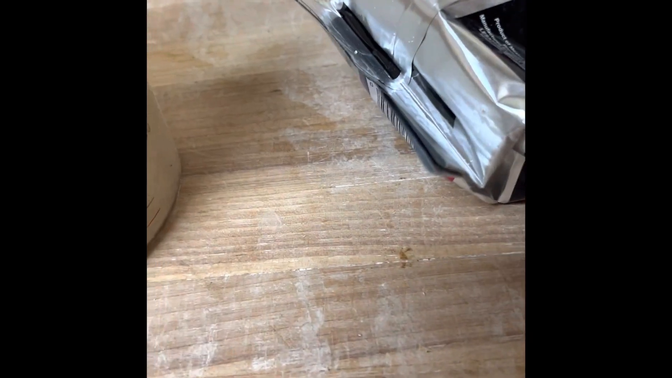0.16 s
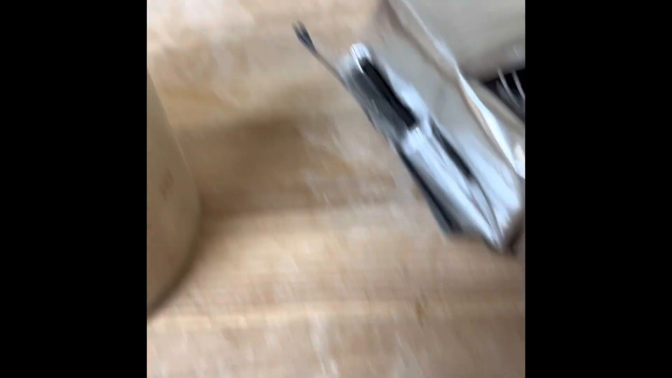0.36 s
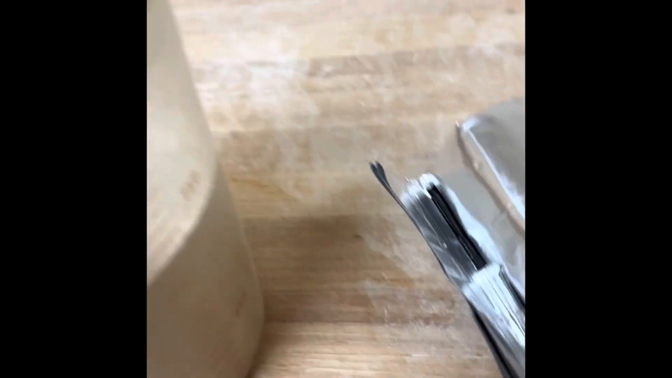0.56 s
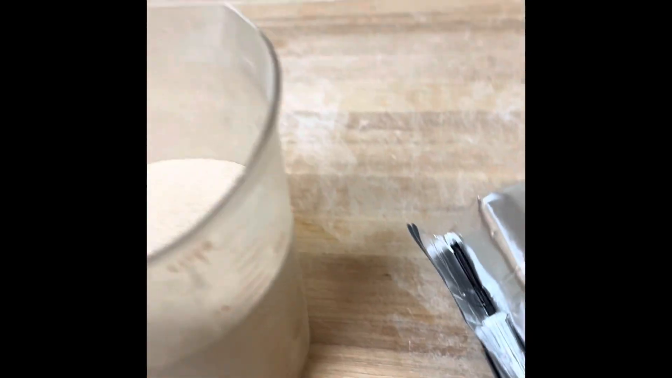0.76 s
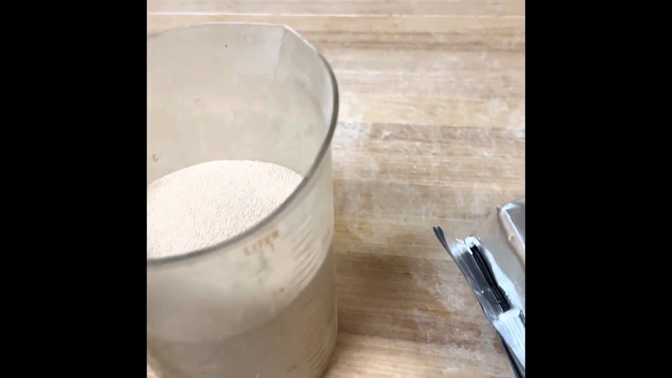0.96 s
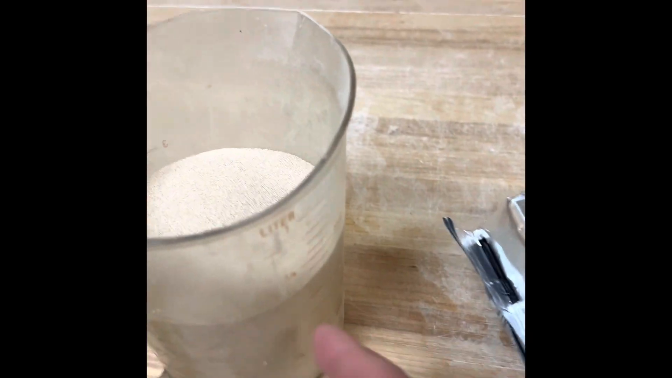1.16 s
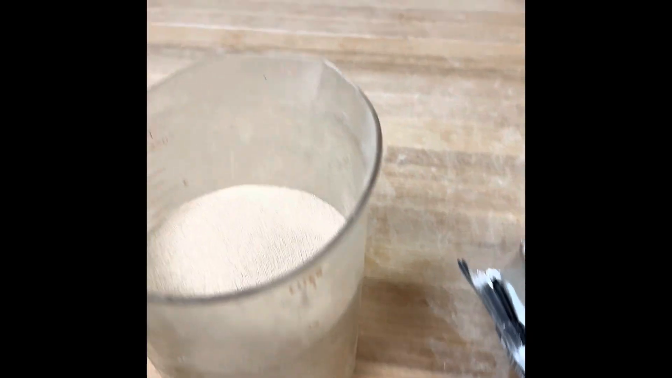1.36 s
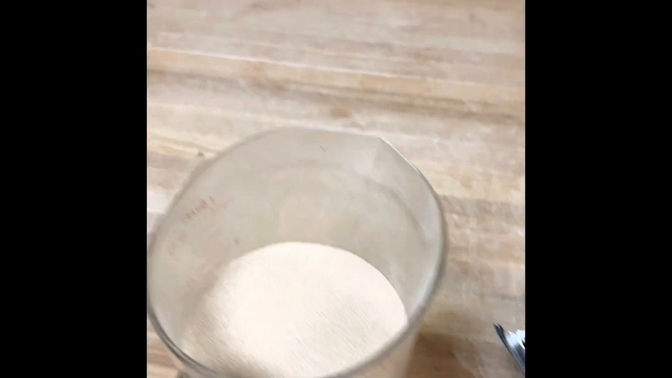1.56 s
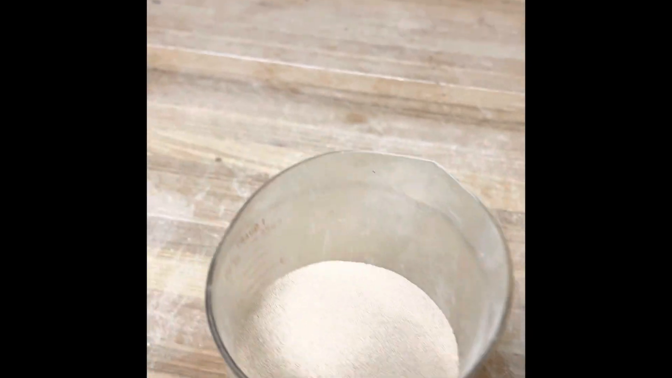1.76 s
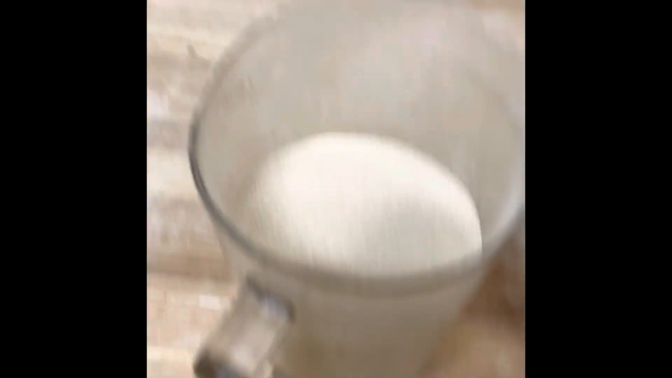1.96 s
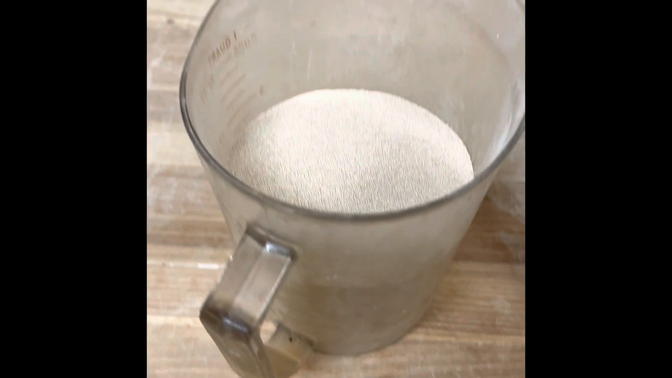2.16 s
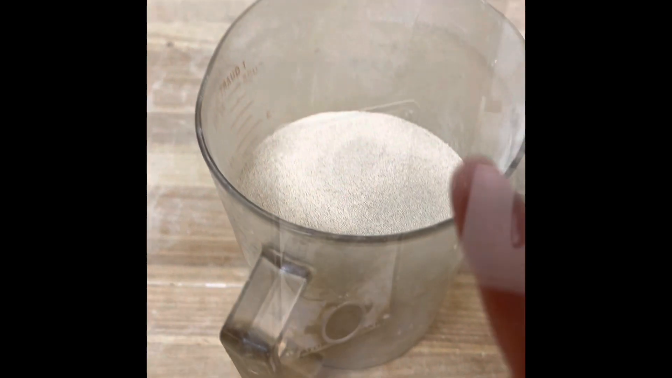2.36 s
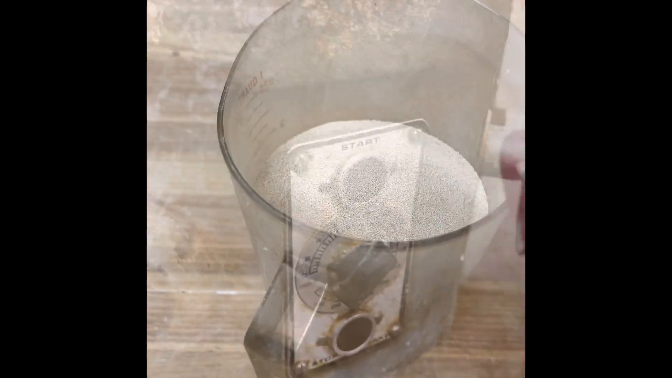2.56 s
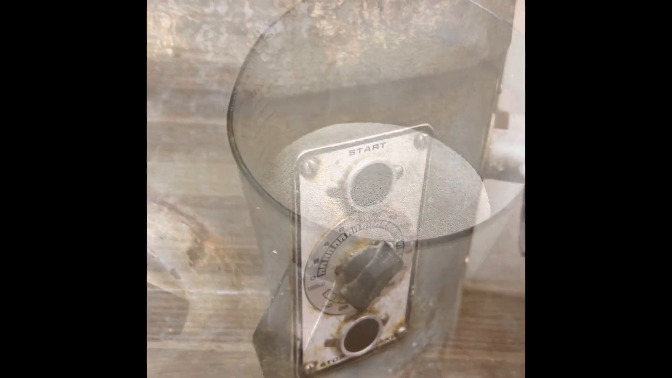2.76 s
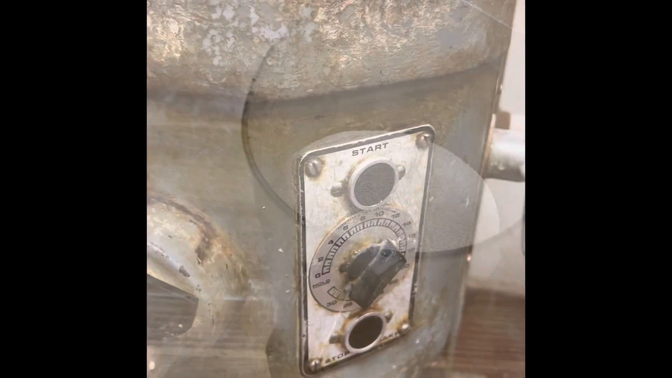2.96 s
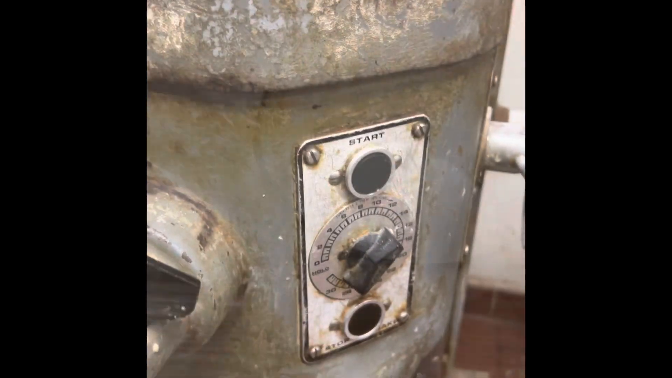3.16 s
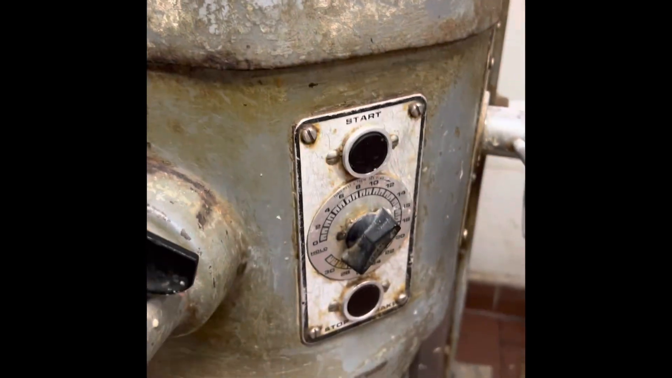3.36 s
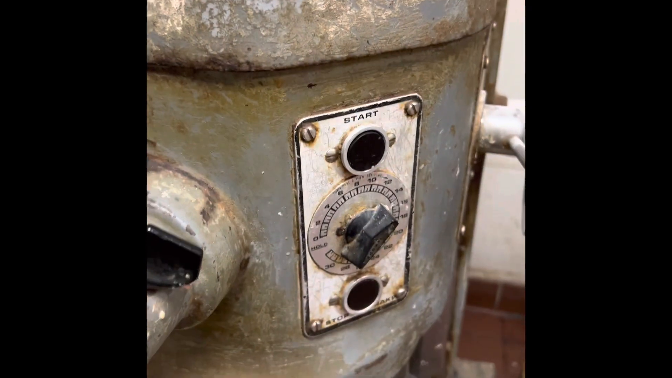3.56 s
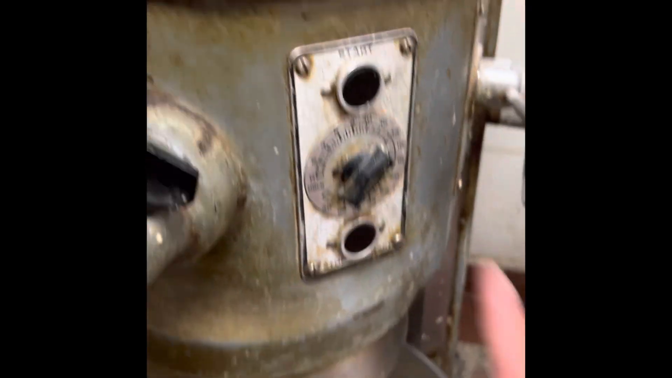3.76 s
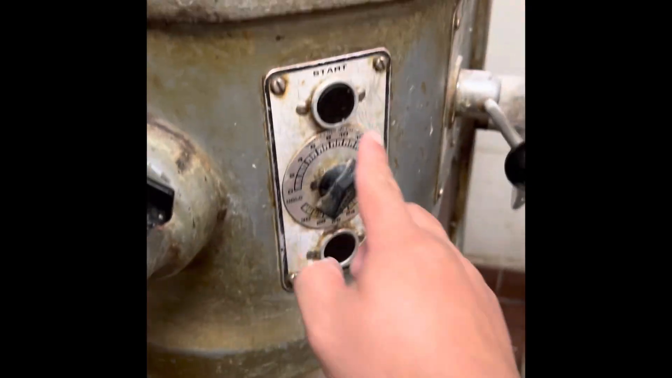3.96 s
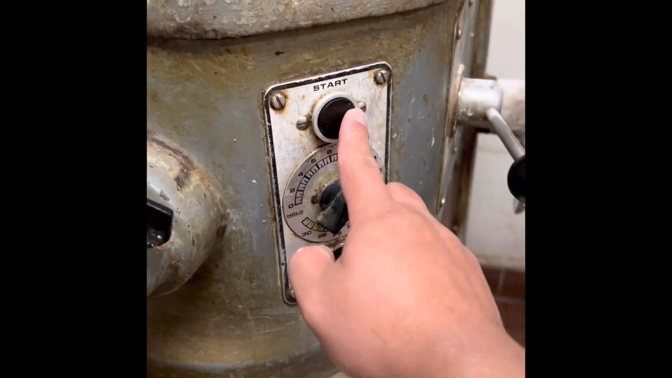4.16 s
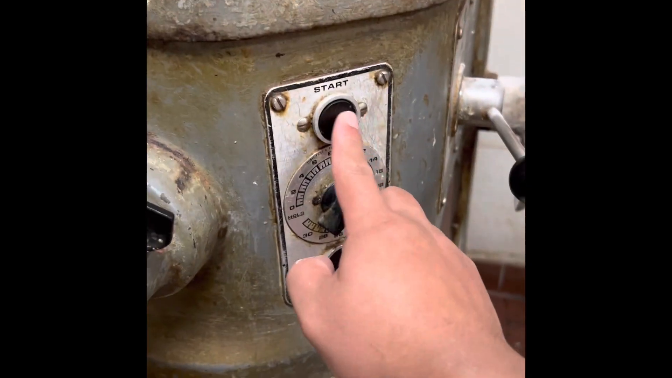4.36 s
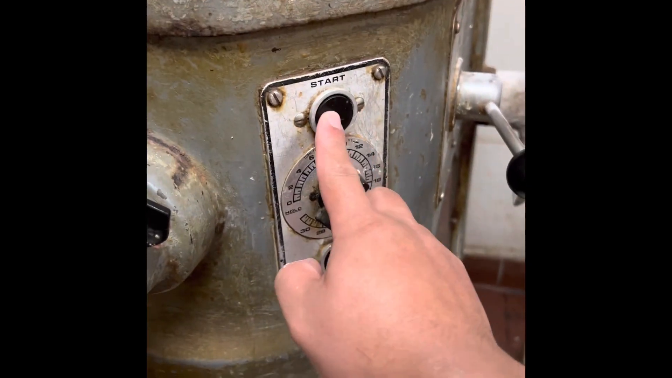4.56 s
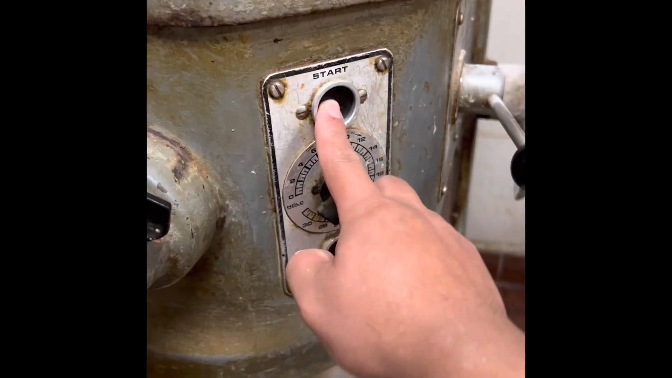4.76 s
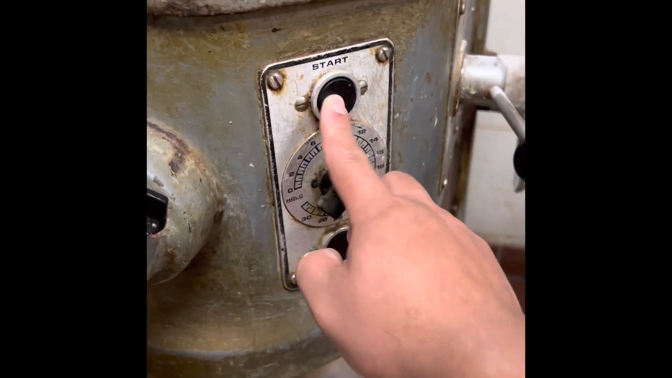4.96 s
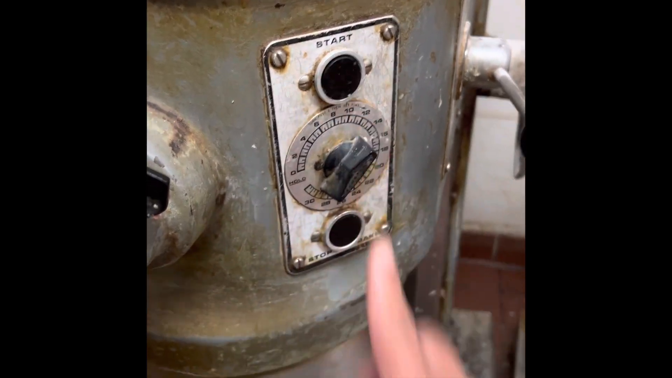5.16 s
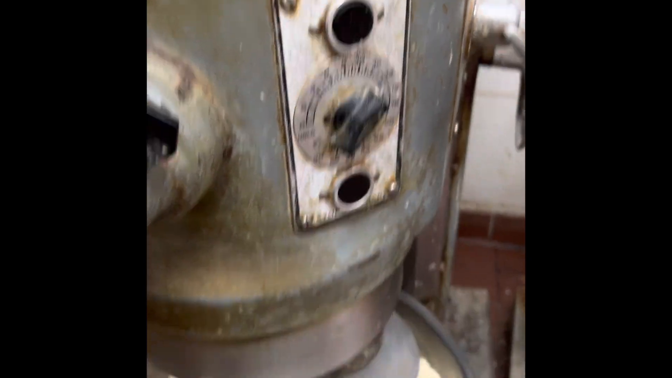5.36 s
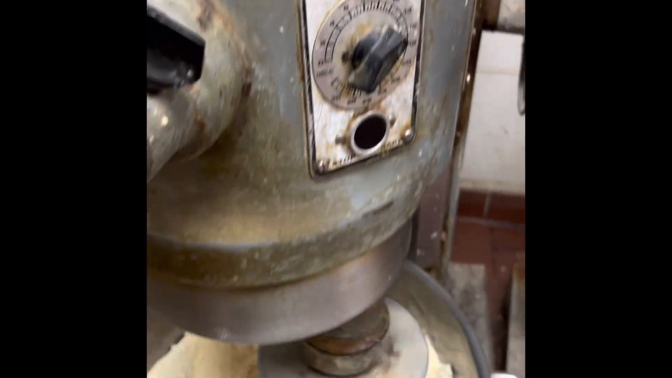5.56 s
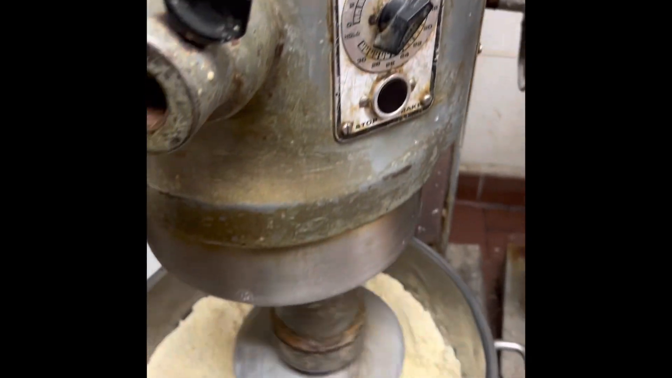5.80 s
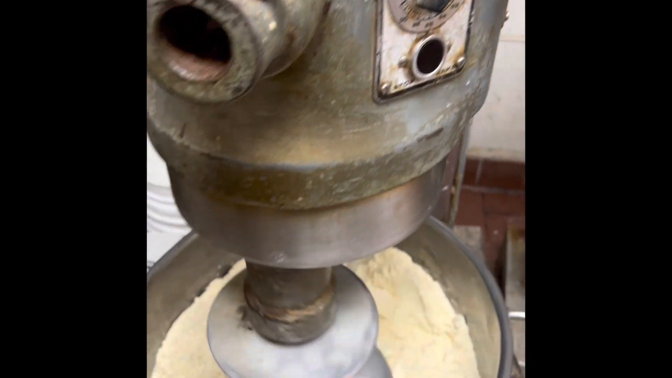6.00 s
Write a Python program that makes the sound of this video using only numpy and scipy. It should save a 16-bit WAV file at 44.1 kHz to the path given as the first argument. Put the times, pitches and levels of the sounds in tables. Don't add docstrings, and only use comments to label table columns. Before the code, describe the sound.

A bakery kitchen hums quietly with fridges and fans, low and steady under faint airy whistles. Around 0.7 s a thin whine near 840 Hz steps up and slowly grows; at 0.8 s the wooden bench gets a soft dull knock. Very faint, high bearing chirps come at 1.4-1.7 s and again at 3.0-3.4 s. Glass ticks lightly at 2.4-2.7 s while the ambience fades, by 3.3 s, into the hum beside a large mixer. A tiny tick falls at 4.1 s. At 4.65 s the button clicks, and at 4.74 s a contactor slams with a huge, echoing steel clunk. The casing groans and climbs in pitch, strongest at 4.8 s; gears whirr faster, and a lighter switch clack lands near 4.98 s. Slack gear teeth knock at 5.2 and 5.7-5.8 s over a rumble swelling about twice a second until the end.

```python
import sys
import numpy as np
from scipy import signal
from scipy.fft import rfft, irfft
from scipy.io import wavfile
from scipy.ndimage import uniform_filter1d

SR = 44100
rng = np.random.default_rng(int(sys.argv[2]) if len(sys.argv) > 2 else 0)


def amplitude_ratio(level_db):
    exponent = np.asarray(level_db, float) / 20
    return 10 ** exponent


def wrap_up_sound(samples):
    columns = np.atleast_2d(samples).T
    tamed = np.clip(columns, -1, 1)
    steps = np.round(tamed * 32767).astype(np.int16)
    wavfile.write(sys.argv[1], SR, steps)


N = 265905
T = np.arange(N) / SR
START_S, DROP_OUT_S = 4.745, 4.96


def evened(x):
    return x / np.sqrt(np.mean(x ** 2) + 1e-20)


def read(points, hz):
    f, value = np.transpose(points)
    return np.interp(np.log(hz + 1), np.log(f + 1), value)


def coloured(x, points):
    hz = np.fft.rfftfreq(x.shape[-1], 1 / SR)
    return irfft(rfft(x) * amplitude_ratio(read(points, hz)), x.shape[-1])


def drift(per_s):
    t = T[::64]
    rates = np.geomspace(0.089 * per_s, per_s, num=12)
    slow = sum(np.sin(2 * np.pi * (f * t + rng.random())) / np.sqrt(f) for f in rates)
    return np.interp(T, t, evened(slow))


def resonate(x, hz, width):
    r = np.exp(-1.5 * np.pi * width / SR)
    pole = [1, -r * np.exp(2j * np.pi * hz / SR)]
    once = signal.lfilter([1 - r], pole, x)
    return 2 * signal.lfilter([1 - r], pole, once).real


def ringing(modes):
    hz = np.fft.rfftfreq(N, 1 / SR)
    power = sum(amplitude_ratio(2 * db) / width / (1 + ((hz - f) / width * 1.3) ** 2) ** 2 for f, width, db in modes)
    low_cut = hz ** 4 / (hz ** 4 + 70 ** 4)
    return evened(irfft(rfft(rng.standard_normal((2, N))) * np.sqrt(power) * low_cut, N))


# (frequency [Hz], left over right [dB])
BALANCE_DB = [(60, 0.5), (150, 0.7), (380, 2.5), (950, -1), (2380, 0.5), (5980, 0.5), (15000, 0.17)]
# (frequency [Hz], left leads by [rad])
LEAD = [(60, 0.53), (170, 0.12), (300, 0.37), (650, -1.85), (1600, -0.33), (3000, -0.6), (15000, -1.7)]


def ports(near, other, likeness):
    hz = np.fft.rfftfreq(N, 1 / SR)
    same = np.clip(read(likeness, hz), 0, 1)
    left = rfft(near)
    right = same * left + np.sqrt(1 - same ** 2) * rfft(other)
    right = right * np.exp(-1j * read(LEAD, hz))
    tilt = amplitude_ratio(read(BALANCE_DB, hz) / 2)
    return irfft(np.array([left * tilt, right / tilt]), N)


def dissolve():
    from_s, to_s = 2.3, 3.33
    return np.clip((T - from_s) / (to_s - from_s), 0, 1)


# (frequency [Hz], width [Hz], level at the bench [dB], level at the mixer [dB])
GRILLES = [(1573, 31, -78.5, -73.5), (2780, 560, -79, -71.5), (3350, 89, -79, -77.5),
           (4330, 520, -77.5, -73.5), (5300, 80, -90, -84.5), (6290, 34, -76.5, -79),
           (6910, 740, -75.5, -86), (12200, 1400, -88, -87)]


def place(air, air_db, tones, column):
    out = amplitude_ratio(air_db - 0.5 + 0.5 * drift(7.4)) * evened(coloured(rng.standard_normal((2, N)), air))
    for row in GRILLES:
        out += amplitude_ratio(row[column] + 1.5 * drift(8.5)) * ringing([(*row[:2], 0)])
    for hz, db in tones:
        turns = np.cumsum(hz * (1 + 0.0008 * drift(4))) / SR + rng.random() + [[0], [0.25]]
        out += np.sqrt(2) * amplitude_ratio(db + 0.55 * drift(6)) * np.sin(2 * np.pi * turns)
    return out


# (frequency [Hz], density [dB per Hz])
BENCH_AIR = [(15, -66), (25, -51), (44, -17.5), (107, -9.5), (150, -13.5), (215, -11.5), (297, -15.5),
             (410, -18), (782, -30), (1050, -35.5), (3000, -44.5), (6550, -55), (9000, -63), (15500, -85)]
MIXER_AIR = [(15, -36), (25, -12.5), (75, -8.5), (113, 2.5), (289, -3), (322, -6.5), (523, -9.5),
             (631, -13.5), (826, -14), (945, -20.5), (1570, -25), (5880, -41), (6550, -31.5),
             (12500, -69.5), (15500, -63)]
# (frequency [Hz], level [dB])
BENCH_TONES = [(120, -51.5), (169.3, -42.5), (214, -54.5), (355, -77), (565, -76), (964, -68), (1556, -77),
               (1841, -77), (2880, -75), (2972, -77), (3208, -75.5), (3332, -81), (6298, -85)]
MIXER_TONES = [(120, -70), (213, -56.5), (297, -56.5), (678, -66), (1556, -77.5), (1600, -72), (2912, -80),
               (2972, -70), (3208, -74.5), (5249, -76.5), (6304, -84)]
# (frequency [Hz], likeness [0-1])
SAME = [(60, 1), (130, 0.96), (290, 0.98), (640, 0.44), (1410, 0.44), (3100, 0.36), (6820, 0.63),
        (15000, 0.081)]


def kitchen():
    bench = amplitude_ratio(-1.1) * (1 - dissolve()) * place(BENCH_AIR, -44, BENCH_TONES, column=2)
    mixer = amplitude_ratio(-0.53) * dissolve() * place(MIXER_AIR, -45.5, MIXER_TONES, column=3)
    return ports(*(bench + mixer), SAME)


def whines():
    turn_s, turn_takes_s = 0.68, 0.085
    away_db, bench_db, grow_db_per_s = -72, -68.5, 4.5
    turned = np.clip((T - turn_s) / turn_takes_s, 0, 1)
    upper_db = away_db + turned * (bench_db - away_db + grow_db_per_s * (T - turn_s))
    upper = amplitude_ratio(-59) * dissolve() - amplitude_ratio(upper_db) * (1 - dissolve())
    lower = amplitude_ratio(-62) * dissolve() + amplitude_ratio(upper_db - 9) * (1 - dissolve())
    lines = 0
    for hz, gain in ((844.3, upper), (824, lower)):
        lines = lines + gain * amplitude_ratio(drift(0.75)) * np.sin(2 * np.pi * hz * T - [[0], [0.8]])
    return np.sqrt(2) * amplitude_ratio(np.array([[1.0], [-1.0]])) * lines


# (time [s], length [s], level [dB], start pitch [Hz], top pitch [Hz])
SQUEAKS = [
    (1.38, .1, -87, 11700, 12250),
    (1.55, .06, -79, 12350, 12750),
    (1.66, 0.14, -79, 11600, 12200),
    (2.997, .06, -80, 12450, 12600),
    (3.29, .08, -80, 12250, 12100),
    (3.37, .07, -78, 12350, 12850),
]


def squeaks():
    out = np.zeros((2, N))
    for s, length, db, from_hz, top_hz in SQUEAKS:
        u = np.arange(0, 1, 1 / (length * SR))
        jitter_hz = 60 * 9 * uniform_filter1d(rng.standard_normal(len(u)), 80)
        hz = from_hz + (top_hz - from_hz) * np.sin(2.6 * u) + jitter_hz
        whistle = np.sqrt(np.sin(np.pi * u)) * np.sin(2 * np.pi * np.cumsum(hz) / SR)
        out[:, round(s * SR):][:, :len(u)] += amplitude_ratio(db + 4) * whistle
    return out


def struck(rows, ring_share, crack_db):
    out, t = np.zeros((2, N)), np.arange(4000) / SR
    for s, db, hz, length in rows:
        crack = rng.standard_normal((2, len(t))) * amplitude_ratio(-60 * t / length)
        ring = resonate(crack, hz, ring_share * hz)
        part = out[:, round(s * SR):][:, :len(t)]
        part += amplitude_ratio(db) * (ring / abs(ring).max() + amplitude_ratio(crack_db) * np.diff(crack, prepend=0))
    return out


# (time [s], level [dB], ring [Hz], length [s])
KNOCKS = [
    (.822, -36.5, 387, .04),
    (.822, -38, 830, 0.083),
    (.824, -47, 1350, 0.028),
    (4.765, -14, 466, 0.055),
    (4.976, -24.5, 125, 0.024),
]
GLASS = [
    (2.414, -46, 4100, .057),
    (2.415, -58, 5900, .03),
    (2.47, -51, 4140, .025),
    (2.603, -57, 4040, .025),
    (2.659, -46.5, 4200, .05),
    (4.144, -56, 5530, .025),
]
BUTTON = [
    (4.657, -51, 5300, .015),
    (4.699, -45, 4670, .015),
    (4.711, -55, 4730, 0.015),
]
CONTACTS = [
    (4.656, -38, 1700, 0.027),
    (4.746, -22, 12000, .015),
    (4.722, -32, 2000, 0.0087),
    (4.727, -28, 1510, 0.016),
    (4.735, -29.5, 2980, .05),
    (4.957, -35, 5600, .015),
]
TEETH = [
    (5.168, -34, 1400, 0.034),
    (5.197, -40, 1760, 0.028),
    (5.231, -36, 1730, 0.02),
    (5.706, -35, 1730, 0.033),
    (5.7365, -31.5, 1880, .012),
    (5.75, -47, 3800, .013),
    (5.802, -33.5, 1709, .018),
]


def ticks():
    bench_and_glass = struck(KNOCKS, 0.2, -68) + struck(GLASS, 0.069, -26)
    switchgear = struck(BUTTON, 0.15, -25) + struck(CONTACTS, 0.99, -36)
    return bench_and_glass + switchgear + struck(TEETH, 0.3, -37)


# (time [s], level [dB], rise [s], t60 [s], ring [Hz])
CLACKS = [
    (4.7429, -16, 0.0037, 0.083, 6950),
    (4.987, -38.5, 0.002, 0.11, 7950),
]
# (frequency [Hz], density [dB per Hz])
CLACK_COLOUR = [(350, -34), (700, -4), (1300, -11), (1750, -1), (2300, -2), (3300, -13), (4000, 16.5),
                (6500, 8), (8700, 3.5), (10700, -8.5), (15000, -15), (15500, -30), (16500, -34)]
# (frequency [Hz], width [Hz], level [dB])
STRAINED = [(1400, 35, -7.5), (1556, 77, -3.5), (1732, 41, 6.5), (1817, 49, -5), (1984, 32, 2.5),
            (2150, 74, -1), (2130, 89, 3.5), (2600, 12, -4)]


def clacks():
    out = np.zeros((2, N))
    colour = [(hz, level + 15 * np.log2(hz / 2000)) for hz, level in CLACK_COLOUR]
    for s, db, rise, t60, ring_hz in CLACKS:
        age = np.maximum(T - s, 0)
        grain_db = 3 * rng.standard_normal(N // 40 + 1).repeat(40)[:N]
        grains = rng.standard_normal((2, N)) * amplitude_ratio(grain_db)
        steel = evened(coloured(grains, colour))
        steel = steel + 0.46 * ringing([(ring_hz, 600, 0)]) + 0.27 * ringing(STRAINED)
        decay = amplitude_ratio(db - 60 * age / t60) * (1 + 1.5 * np.exp(-age / 0.006))
        out += steel * decay * np.minimum(age / rise, 1) ** 2
    return out


# (frequency [Hz], t60 [s])
ROOM = [(250, .6), (1000, 0.85), (4000, 0.43), (12000, 0.3)]


def room(x):
    taps = np.zeros((2, SR))
    at = np.arange(300, SR - 20, 20) + rng.integers(0, 20, (2, (SR - 301) // 20))
    np.put_along_axis(taps, at, rng.choice([-1., 1.], at.shape), 1)
    hz, t, z = signal.stft(taps, SR, nperseg=256)
    fading = z * amplitude_ratio(-60 * t / read(ROOM, hz)[:, None])
    tail = signal.istft(fading, SR, nperseg=256)[1]
    return signal.fftconvolve(x, tail / np.linalg.norm(tail[0]), axes=1)[:, :N]


def climb(from_hz, to_hz, since_s, takes_s):
    return to_hz - (to_hz - from_hz) * np.exp(-np.maximum(T - since_s, 0) / takes_s)


def tone(hz, db, throb, sweep, top_s):
    shaft = 2 * np.pi * 27.0 * (T - top_s)
    load = np.clip((5.0 - T) / 0.062, 0.2, 1)
    turns = np.cumsum(hz * (1 + sweep * load * np.sin(shaft))) / SR + rng.random((2, 1))
    swell = 1 + throb * np.cos(shaft) + 0.091 * drift(60)
    return np.sqrt(2) * amplitude_ratio(db) * swell * np.sin(2 * np.pi * turns)


def gear_mesh():
    from_s, peak_s, end_s = 4.9, 4.965, 5.13
    hz = climb(780, 890, from_s, 0.0735) * (1 + 0.028 * drift(70))
    db = -24.5 - 89 * abs(T - peak_s) + 2.3 * drift(90)
    beats = 1 + 0.61 * np.cos(2 * np.pi * 15.6 * (T - peak_s))
    gate = np.clip(np.minimum(T - from_s, end_s - T) / 0.029, 0, 1)
    return tone(hz, db, 0.11, 0.029, 5.6) * beats * gate


# (time [s], level [dB])
TORQUE = [
    (4.747, -76),
    (4.762, -20),
    (4.789, -26),
    (4.806, -8.5),
    (4.86, -15.5),
    (4.925, -24.5),
    (5.003, -24),
    (5.049, -39),
    (5.2, -33.5),
]
# (frequency [Hz], level [dB])
RUN_TONES = [(360, -49), (389, -46.5)]
# (frequency [Hz], likeness [0-1])
SAME_NEAR = [(60, 1), (130, 1), (290, 1), (640, 0.42), (1410, 0.92), (3100, 0.2), (6820, 1), (15000, 0.9)]


def groan():
    s, db = np.transpose(TORQUE)
    lag_s = 0.018
    late_db = np.interp(T - lag_s, s, db)
    ends = np.clip((s[-1] + 0.075 - T) / 0.14, 0, 1) * (T > START_S)
    low_db = np.interp(T, s, db) + 2.5 * drift(45)
    low = tone(254.8, low_db, 0.29, 0.0041, 4.82)
    high_hz = climb(295, 363.5, START_S + lag_s, 0.11)
    high = tone(high_hz, late_db + 0.5, 0.42, 0.078, 4.815)
    running = 0
    for hz, level_db in RUN_TONES:
        running = running + tone(hz * (1 + 0.0066 * drift(12)), level_db + 3 * drift(15), 0.52, 0.01, 5.2)
    grind = ends * amplitude_ratio(-25 + 0.66 * late_db) * ringing(STRAINED)
    casing = ends * (low + high) + running * np.clip((T - DROP_OUT_S) / 0.053, 0, 1)
    panned = ports(*casing, SAME_NEAR) * amplitude_ratio(np.array([[0.5], [-0.5]]))
    return panned + ports(*(gear_mesh() + grind), SAME_NEAR)


def shake_level(swell_db, running_db, starting_db, first_db, second_db, t60):
    orbit_s, orbit_top_s, settle_s = 0.46, 5.42, 0.12
    starting = np.exp(-np.maximum(T - DROP_OUT_S, 0) / settle_s)
    rumble_db = running_db + swell_db * np.cos(2 * np.pi * (T - orbit_top_s) / orbit_s)
    power = amplitude_ratio(2 * (rumble_db + (starting_db - rumble_db) * starting))
    for (s, *_), db in zip(CLACKS, (first_db, second_db)):
        power += np.clip((T - s) / 0.004, 0, 1) * amplitude_ratio(2 * (db - 60 * np.maximum(T - s, 0) / t60))
    return np.sqrt(power)


# (frequency [Hz], width [Hz], level [dB])
BODY = [(101.5, 9.1, -42), (125, 15, -2.5), (148, 16.3, 6), (175, 20, 2), (217.6, 3.7, -2.5),
        (257.6, 16.5, 6.5), (348, 9.2, -5), (405, 25, -6.5)]
COVER = [(470, 28, -31.5), (548, 27, 1.5), (624, 30, 9.5), (698, 15, 11.5), (822, 39, 11), (880, 75, -14),
         (964, 40, 7), (1088, 29, 2.5)]
GEARS = [(1390, 55, 3), (1547, 33, 6), (1783, 28, -9), (1832, 18, 8), (1945, 10, 5), (2130, 44, 0.5),
         (2050, 71, -13), (2596, 117, 9)]
# (frequency [Hz], density [dB per Hz])
HISS = [(1500, -12), (2600, 4), (4000, -2), (7000, -9), (9000, -16.5), (12000, -22.5), (15000, -20),
        (16500, -63)]
# (running level [dB], starting level [dB], chatter after first clack [dB], after second [dB], its t60 [s])
SHAKE_LAYERS = [
    (-37, -38.5, -28.5, -24.5, 0.62),
    (-43, -27, -52, -44, 0.24),
    (-52, -37.5, -22.5, -30, .3),
    (-55.5, -48, -19, -46, 0.25),
]


def shaking():
    load = np.clip((5.2 - T) / 0.088, 0, 1)
    body = ringing(BODY) + 0.45 * ringing([(176, 300, 0)])
    cover = ringing(COVER) + (0.63 + 0.3 * load) * ringing([(674, 475, 0)])
    gears = load * ringing(STRAINED) + (1 - load) * ringing(GEARS)
    gears = gears + 0.5 * ringing([(2000, 2100, 0)])
    hiss = evened(coloured(rng.standard_normal((2, N)), HISS))
    orbit_swells_db = (2.5, 1.9, 0.49, 0.6)
    out = np.zeros((2, N))
    for part, swell_db, levels in zip((body, cover, gears, hiss), orbit_swells_db, SHAKE_LAYERS):
        out += amplitude_ratio(-1.5) * shake_level(swell_db, *levels) * part
    gate = np.clip((T - START_S) / 0.0042, 0, 1) * amplitude_ratio(1.46 * drift(40))
    return gate * out


def scene():
    background = kitchen() + whines() + squeaks()
    taps, slams = ticks(), clacks()
    echo = room(amplitude_ratio(-10.5) * taps + amplitude_ratio(-4.5) * slams)
    machine = ports(*(taps + slams + echo + shaking()), SAME_NEAR)
    return background + groan() + machine


def roll_off(x):
    return signal.sosfilt(signal.butter(12, 16610, fs=SR, output="sos"), x)


def record(dry):
    limited = np.tanh(dry / 1.22) * 1.393
    band_edge = signal.firwin(255, 16300, fs=SR)
    edged = signal.oaconvolve(limited, band_edge[None], "same")
    return roll_off(edged)


dry = scene()
out = record(dry)
wrap_up_sound(out)
```